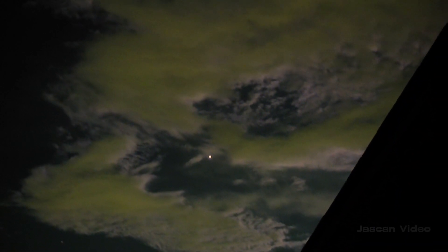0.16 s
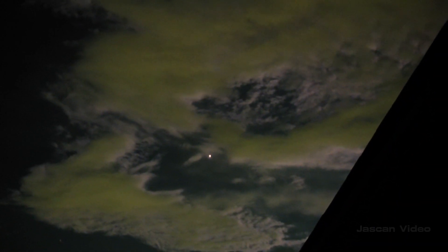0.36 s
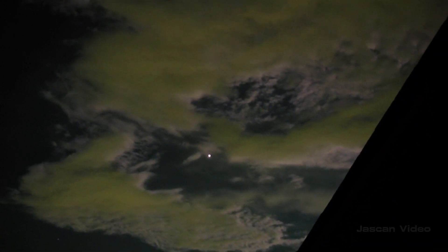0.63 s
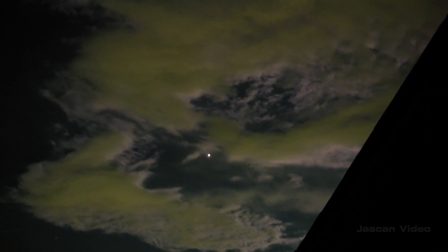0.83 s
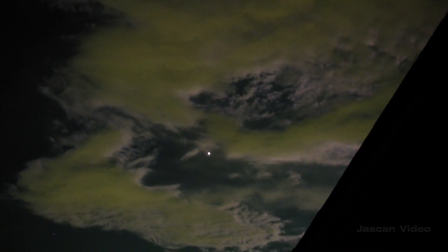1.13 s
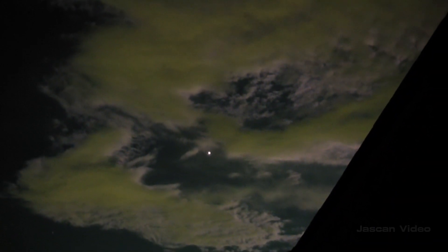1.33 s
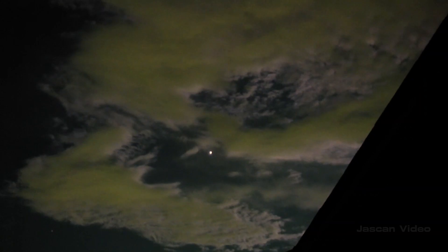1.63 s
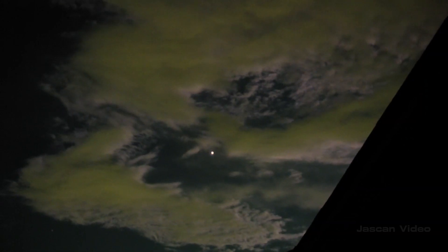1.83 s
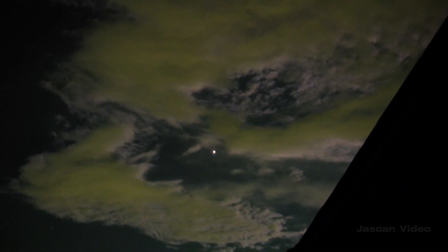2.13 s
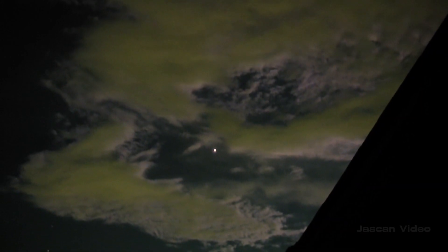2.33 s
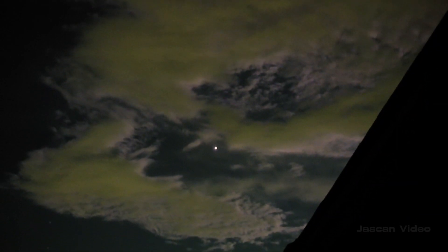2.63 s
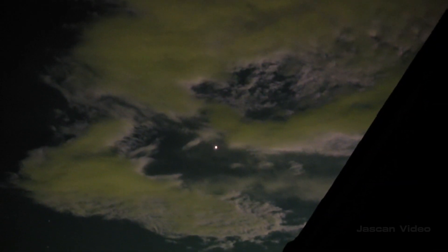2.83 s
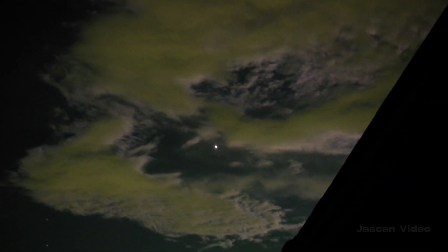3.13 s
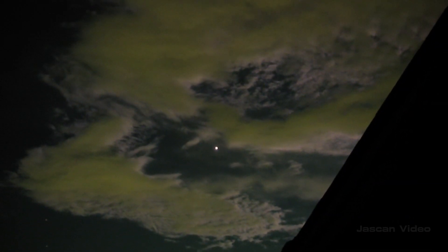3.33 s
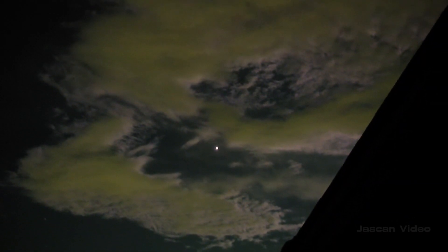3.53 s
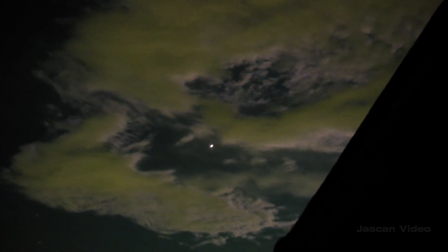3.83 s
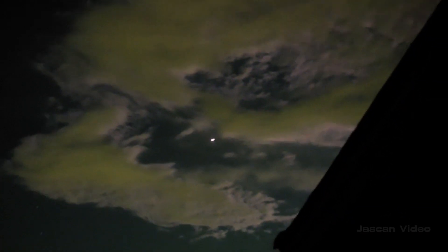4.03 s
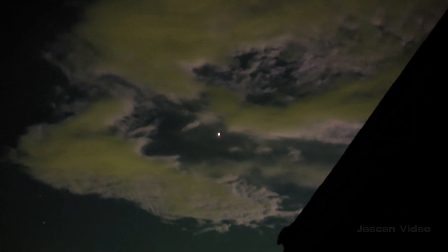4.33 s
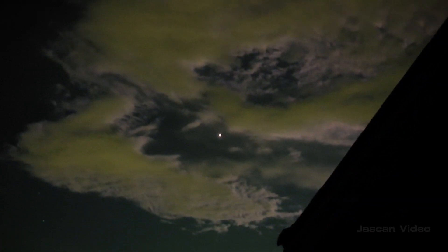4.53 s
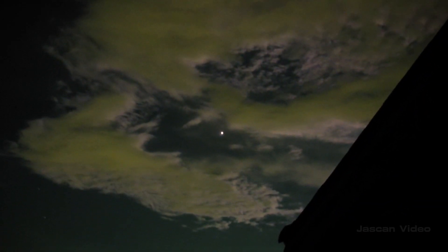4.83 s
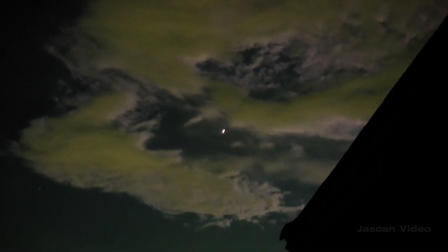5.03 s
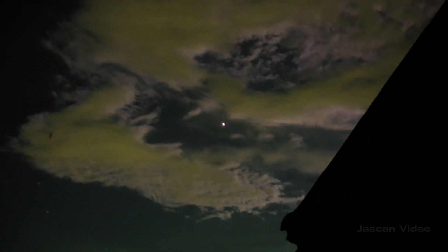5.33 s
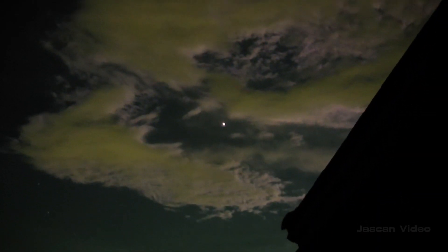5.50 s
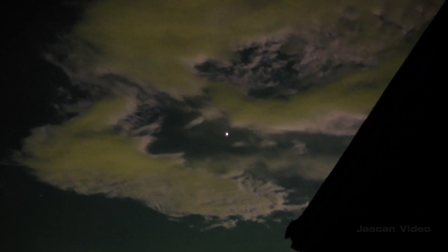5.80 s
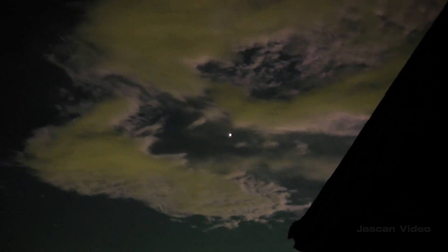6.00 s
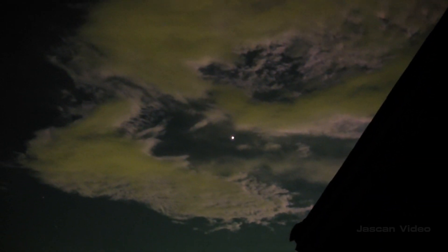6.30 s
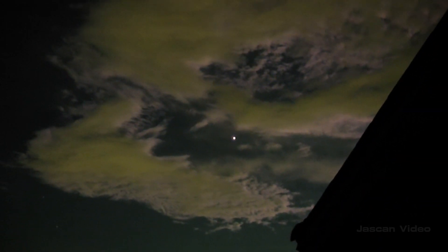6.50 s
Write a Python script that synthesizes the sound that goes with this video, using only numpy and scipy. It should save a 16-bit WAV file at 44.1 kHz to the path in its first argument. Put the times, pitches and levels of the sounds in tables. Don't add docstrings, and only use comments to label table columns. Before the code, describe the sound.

A hand-held stereo camera hears constant sprinkler spray outdoors, countless drops merged into a smooth, piercing hiss with little body. Weak, short reflections colour it, and faint treble flickers with a slightly watery, compressed texture. Beneath lie a low wavering motor hum and a tiny steady whine. One short soft knock lands on the right after the midpoint, then an almost hidden brush near the end.

```python
import sys
import numpy as np
from scipy import signal
from scipy.fft import rfft, irfft
from scipy.io import wavfile
from scipy.ndimage import uniform_filter1d

SR = 44100
rng = np.random.default_rng(int(sys.argv[2]) if len(sys.argv) > 2 else 0)


def generate_wav(sig):
    pcm = np.round(np.clip(np.atleast_2d(sig).T, -1, 1) * 32767).astype(np.int16)
    wavfile.write(sys.argv[1], SR, pcm)


def gain_from_db(level_db):
    decades = np.asarray(level_db, float) / 20
    return 10 ** decades


N = 293378


def evened(x):
    return x / np.sqrt(np.mean(x ** 2) + 1e-20)


def blotches(shape, wide, long):
    x = rng.standard_normal(shape[::-1]).T
    for _ in range(2):
        x = uniform_filter1d(x, wide, axis=-2)
        x = uniform_filter1d(x, long, axis=-1)
    return evened(x)


def shading(table, hz):
    bells = 0
    for f, width, left, right in table:
        bells = bells + np.exp(-2 * ((hz - f) / width) ** 2) * np.array([[left], [right]])
    return bells[..., None]


# t/s, turn/steps, tip/steps
HAND_MOVES = [(0.0, 0.61, 0.5), (1.2, -0.79, 0.3), (1.8, -0.8, -0.2), (2.65, -1.4, 0), (3.6, 0.11, -0.7),
              (4.0, 0.53, -.9), (4.3, 3.1, 1.2), (4.9, -0.98, -3.5), (5.3, 1.1, -1.5), (5.8, 0.9, 1),
              (6.2, 2.4, 1.3), (6.65, 1.8, 2)]
# f/Hz, width/Hz, left level/dB per step, right level/dB per step
TURN_SHADING = [(2550, 450, -.8, -0.46), (3360, 360, 1.2, 0.5), (4160, 550, -0.2, 0.1),
                (4930, 490, -0.9, -1), (5540, 290, 1.36, .5), (6250, 840, -1, -2.5), (6380, 330, 1.2, 1.5),
                (6800, 640, -0.9, 0), (9100, 370, -1.2, 0.3), (9800, 500, .7, -1.1), (11100, 500, 1, -2.4)]
# f/Hz, width/Hz, left level/dB per step, right level/dB per step
TIP_SHADING = [(1720, 460, -.6, -0.6), (2470, 300, 1, 0.61), (3260, 800, -1, -1.1), (5300, 900, 0.34, 1),
               (6170, 360, -1.4, -1.3), (7060, 400, 1.8, 1), (7400, 320, -1.1, -.8),
               (12100, 3400, -0.7, -0.17)]


def hand_shading(hz, t):
    s, turn, tip = np.transpose(HAND_MOVES)
    turn_db = shading(TURN_SHADING, hz) * np.interp(t, s, turn)
    return turn_db + shading(TIP_SHADING, hz) * np.interp(t, s, tip)


# f/Hz, left level/dB per Hz, right level/dB per Hz, likeness of the ports/0-1, right phase/rad
AIR_SPECTRUM = [(22, -91.0, -91.4, 0.76, 0.0), (65, -85.3, -85.7, 0.83, 0.05),
                (323, -83.7, -83.6, 0.78, 0.03), (754, -87.5, -87.8, 0.82, -0.03),
                (1055, -83.0, -83.0, 1, 0.02), (1357, -83.5, -83.2, 0.95, -0.06),
                (1486, -86.2, -86.0, 0.87, -0.0), (1916, -77.4, -77.8, 0.99, -0.13),
                (2089, -77.6, -76.3, 0.81, -0.29), (2519, -77.0, -67.9, 0.87, -1.72),
                (2735, -79.9, -73.5, 0.72, -2.78), (2885, -78.1, -76.6, 0.72, -3.53)]
JET_SPECTRUM = [(2907, -78.4, -76.1, 0.63, -3.5), (3079, -75.6, -76.9, 0.14, -4.66),
                (3122, -74.3, -76.2, 0.12, -0.46), (3338, -71.5, -70.9, 0.38, -8.72),
                (3553, -68.6, -64.6, 0.65, -9.17), (3725, -63.3, -60.6, 0.68, -10.65),
                (4113, -55.6, -58.6, 0.64, -13.24), (4371, -60.6, -64.6, 0.85, -14.9),
                (4544, -66.4, -65.9, 0.74, -15.46), (4716, -62.9, -62.6, 0.46, -17.58),
                (5017, -51.0, -56.0, 0.88, -18.7), (5276, -47.3, -52.4, 0.89, -18.83),
                (5534, -56.0, -53.1, 0.69, -19.85), (5685, -59.4, -55.1, 0.44, -22.38)]
SPLASH_SPECTRUM = [(5706, -58.5, -55.6, 0.65, -23.04), (5922, -57.3, -54.4, 0.92, -24.58),
                   (6481, -67.3, -61.7, 0.54, -27.7), (6611, -68.7, -62.3, 0.41, -29.92),
                   (6869, -65.4, -62.7, 0.86, -31.79), (7041, -66.3, -66.4, 0.64, -32.21),
                   (7515, -67.3, -79.3, 0.21, -35.66), (7644, -73.8, -82.9, 0.38, -35.98),
                   (7730, -91.0, -94.0, 0.16, -36.9), (7817, -78.8, -83.3, 0.49, -36.89),
                   (7860, -76.8, -81.2, 0.47, -36.36), (8333, -80.0, -76.2, 0.67, -38.16),
                   (8635, -82.2, -81.0, 0.21, -40.07), (8786, -82.1, -79.6, 0.15, -41.82)]
MIST_SPECTRUM = [(8807, -83.1, -78.0, 0.13, -42.79), (9238, -73.8, -72.7, 0.67, -46.37),
                 (9711, -79.2, -79.2, 0.43, -44.37), (10357, -83.2, -73.1, 0.81, -45.89),
                 (10831, -88.1, -84.0, 0.45, -46.16), (11391, -91.4, -82.5, 0.61, -46.32),
                 (11779, -98.1, -93.9, 0.16, -46.24), (12080, -96.2, -89.1, 0.45, -45.84),
                 (13587, -103.2, -93.8, 0.28, -43.52), (13975, -99.7, -97.3, 0.42, -43.83),
                 (14836, -102.6, -96.6, 0.2, -43.41), (15310, -105.4, -104.9, 0.12, -46.53),
                 (15698, -105.2, -100.7, 0.09, -51.33), (15784, -120.6, -119.0, 0.25, -48.02)]
PART_TRIM = [0.4, 0.18, 0.11, 0.43]


def spray(patchy_db=0.5, drift_db=0.5, gust_db=0.18, top_flicker_db=0.0):
    frames, hz = N // 512 + 5, np.fft.rfftfreq(2048, 1 / SR)
    t = np.arange(frames) * 512 / SR
    shape = (len(hz), frames)
    column = hz[:, None]

    parts = (AIR_SPECTRUM, JET_SPECTRUM, SPLASH_SPECTRUM, MIST_SPECTRUM)
    knots, left_db, right_db, like, phase = np.concatenate(parts).T
    trim_db = np.repeat(PART_TRIM, [len(p) for p in parts])
    curves = (left_db + trim_db, right_db + trim_db, like, phase)
    left_db, right_db, like, phase = (np.interp(np.log(hz + 1), np.log(knots), c)[:, None] for c in curves)
    like = np.minimum((1 + 0.09 * (column > 1800)) * like, 1)
    left_db += np.clip(column / 2000 - 5, 0, 1)

    top_lift_db = 3.5 * np.clip(column / 500 - 29.6, 0, 1)
    rumble_cut_db = -3 * np.log2(1 + (46 / (column + 1)) ** 4) + 0.8 * (column < 220)
    level_db = rumble_cut_db + top_lift_db + np.zeros(shape)
    level_db += patchy_db * blotches(shape, wide=12, long=4)
    gust_depth_db = gust_db + top_flicker_db * np.clip(column / 6000 - 1.5, 0, 1)
    level_db += gust_depth_db * blotches(shape, wide=120, long=2)
    drift = drift_db * np.clip(column / 5000, 0.3, 2.5) * blotches((2,) + shape, wide=10, long=35)

    a, b, c, d = rng.standard_normal((frames, len(hz), 4)).T
    near = a + 1j * b
    own = c + 1j * d
    far = (like * near + np.sqrt(1 - like ** 2) * own) * np.exp(1j * phase)
    z = np.array([near * gain_from_db(left_db), far * gain_from_db(right_db)])
    z = z * gain_from_db(level_db + hand_shading(hz, t) + drift) * (column < knots[-1])
    sound = signal.istft(z, nperseg=2048, noverlap=1536)[1][:, :N]
    power = np.sum(gain_from_db(left_db) ** 2 + gain_from_db(right_db) ** 2) / 2 * hz[1]
    return np.sqrt(power) * evened(sound)


def yard(x, echo_db=-10.5, low_db=-5, first_s=0.004, t60=0.16, split_hz=1800):
    t = np.arange(4096) / SR
    shape = (2, 3, len(t))
    taps = rng.standard_normal(shape) * (rng.random(shape) < 0.05)
    taps *= (t > first_s) * np.minimum(t / 0.012, 1) * gain_from_db(-60 * t / t60)
    low = signal.lfilter(*signal.butter(2, split_hz, fs=SR), taps[:, 2:])
    own = signal.lfilter(*signal.butter(2, split_hz, "high", fs=SR), taps[:, :2])
    echoes = gain_from_db(low_db) * low + own
    echoes /= np.linalg.norm(echoes, axis=-1, keepdims=True)
    angle = np.pi / 2 * np.arange(N) / N
    wet = 0
    for weight, echo in zip((np.cos(angle), np.sin(angle)), echoes):
        wet = wet + weight * signal.oaconvolve(x, echo, axes=1)[:, :N]
    return (x + gain_from_db(echo_db) * wet) / np.sqrt(1 + gain_from_db(2 * echo_db))


# f/Hz, level/dB rms
HUM_TONES = [(44, -80), (58.6, -78), (86, -77), (117.26, -57), (117.78, -63), (120.05, -72), (234.51, -51),
             (240.1, -74), (351.77, -77), (586.3, -76), (703.5, -77), (1000.58, -64), (1172.6, -74),
             (1342, -76)]


def hum(level_db=-0.37, in_step_s=0.99, waver_db=0.3, pan_db=0.9, lead_s=0.0001):
    t = np.arange(N) / SR - in_step_s
    waver = np.interp(t, np.linspace(t[0], t[-1], 30), rng.standard_normal(30))
    lead = np.array([[0], [lead_s]])
    tones = 0
    for hz, db in HUM_TONES:
        tones = tones + np.sqrt(2) * gain_from_db(db) * np.cos(2 * np.pi * hz * (t + lead))
    return tones * gain_from_db(level_db + waver_db * waver) * gain_from_db([[pan_db / 2], [-pan_db / 2]])


# t/s, right level/dB, left level relative to right/dB, pitch/share, upper modes' level/dB
TOUCHES = [
    (3.7685, -25, -20, 1, 0),
    (5.9697, -40, 0, .37, -20),
]
# f/Hz, level/dB, rise/s, fall by 60 dB/s
BODY_MODES = [(610, 0, .0065, .024), (880, -11, .005, .03), (1200, -13, .004, .016),
              (1600, -5, .0042, .014), (1830, -3, .0042, .012), (2300, -11, .007, .012)]


def tap():
    out, t = np.zeros((2, N)), np.arange(2000) / SR
    for s, right_db, left_db, pitch, upper_db in TOUCHES:
        ports = gain_from_db([[right_db + left_db], [right_db]])
        place = out[:, round(s * SR):][:, :len(t)]
        for hz, db, rise, t60 in BODY_MODES:
            mode_db = db + upper_db * (hz > BODY_MODES[0][0])
            swell = np.sin(np.pi / 2 * np.minimum(t / rise, 1)) ** 2
            fall = gain_from_db(mode_db - 60 * np.maximum(t - rise, 0) / t60)
            place += ports * swell * fall * np.sin(2 * np.pi * pitch * hz * t)
    return out


# f/Hz, left level/dB, right level/dB
SILENCE_MARGIN = [(8300, -14, -14), (8700, -3, -3), (9100, -14, -16), (10800, -5, -7), (11800, 0, -1),
                  (12600, -2.5, -3.5), (14500, -1.5, -4), (15000, -.5, -1.5), (15150, 2.5, 2.5),
                  (15800, 2, 2)]


def faint_bands_lost(x, swing_db=3.0, scatter_db=3.5, masked_db=-7.5):
    hz, t, z = signal.stft(x, SR, nperseg=1024, noverlap=768)
    band, block = np.arange(len(hz)) // 6, np.arange(len(t)) // 4 * 4
    band_hz = hz[::6]
    edge_hz, *margins = np.transpose(SILENCE_MARGIN)

    def band_db(z, size=12):
        power = np.add.reduceat(abs(z) ** 2, np.arange(0, len(hz), 6), axis=-2) / 6
        return 10 * np.log10(uniform_filter1d(power, size=size, axis=-1) + 1e-20)

    swing = np.tanh(evened(uniform_filter1d(rng.standard_normal(len(t)), size=10)))
    scatter = scatter_db * blotches((3, band[-1] + 1, len(t)), wide=1, long=7)
    margin_db = np.array([np.interp(band_hz, edge_hz, m, left=-99) for m in margins])[..., None]
    usual_db = uniform_filter1d(band_db(z), size=60, axis=-1)
    limit_db = usual_db + margin_db + swing_db * swing + scatter[:2]
    z = z * (band_db(z) > limit_db)[:, band][:, :, block]

    mid, side = (z[0] + z[1]) / 2, (z[0] - z[1]) / 2
    loud_db = -99 * (abs(band_hz - 5300) < 2100)[:, None]
    cover_db = band_db(side) + masked_db + loud_db + scatter[2]
    mid = mid * (band_db(mid) > cover_db)[band][:, block]
    return signal.istft(np.array([mid + side, mid - side]), SR, nperseg=1024, noverlap=768)[1][:, :N]


def narrow_gap(x, gap_hz=7733, width_hz=45, depth_db=-13):
    hz = np.fft.rfftfreq(N, 1 / SR)
    gap = gain_from_db(depth_db * np.exp(-2 * ((hz - gap_hz) / width_hz) ** 2))
    return irfft(rfft(x, axis=1) * gap, N, axis=1)


def scene():
    return yard(spray()) + hum() + tap()


def low_pass(x):
    return signal.sosfilt(signal.butter(12, 15765, fs=SR, output="sos"), x)


def record(dry):
    mix = narrow_gap(faint_bands_lost(dry))
    return low_pass(mix)


dry = scene()
out = record(dry)
generate_wav(out)
```